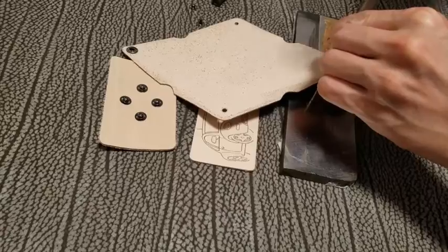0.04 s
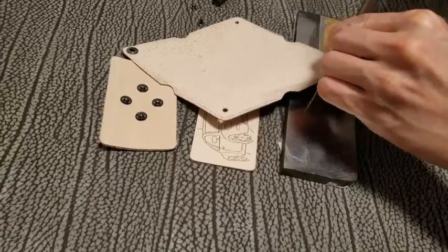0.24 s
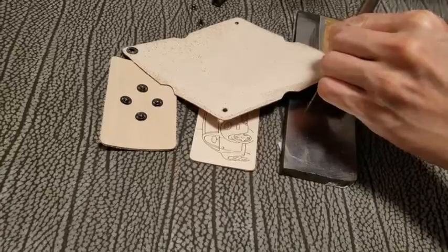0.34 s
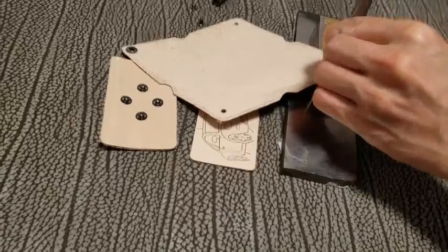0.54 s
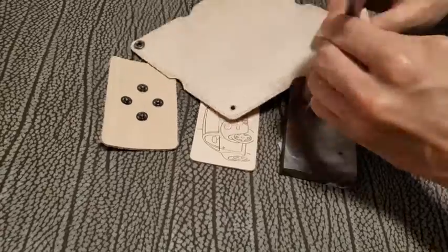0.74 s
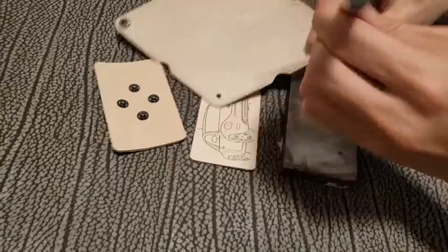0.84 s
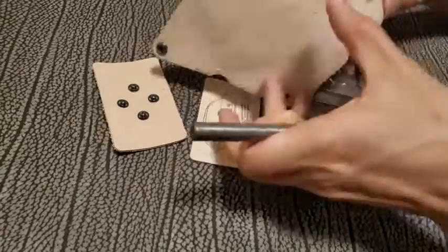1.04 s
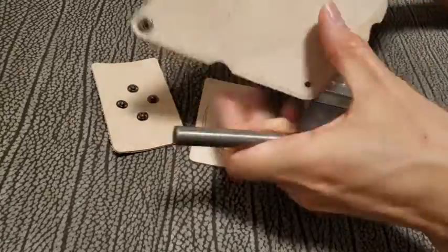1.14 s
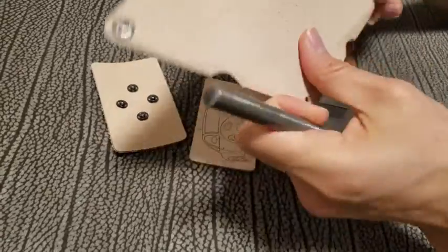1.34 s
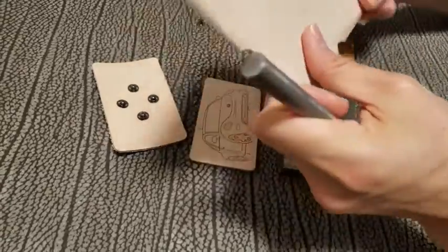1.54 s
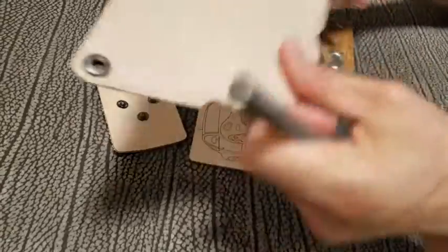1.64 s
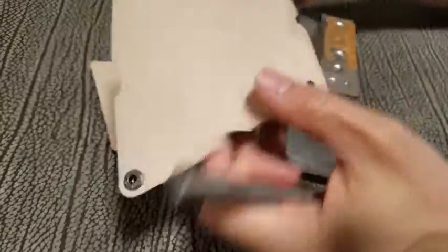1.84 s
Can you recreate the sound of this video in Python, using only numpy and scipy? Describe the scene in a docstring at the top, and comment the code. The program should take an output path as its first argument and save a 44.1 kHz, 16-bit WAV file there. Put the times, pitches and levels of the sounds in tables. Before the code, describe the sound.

A steel rod knocks sharply on a metal block on a table, then the block bumps and rattles with duller, woody thuds; faint ticks and leather rubs follow in a quiet room, close stereo microphone.

```python
"""A quiet room, a leather work table: a steel setting rod knocks on a steel block lying on the table top,
then the block is bumped and rattles there. Small ticks and rubs of tool and leather follow.
Knocks are dying sines for table and steel plus cracks and scatter of noise; ticks, rubs, room tone and
hum are shaped noise. The two microphone channels differ by small lags and partly independent noise.
The recorder ducks after loud knocks, then recovers."""
import sys
import numpy as np
from scipy import signal
from scipy.fft import rfft, irfft
from scipy.io import wavfile
from scipy.ndimage import uniform_filter1d, minimum_filter1d

SR = 44100
rng = np.random.default_rng(int(sys.argv[2]) if len(sys.argv) > 2 else 0)


def materialize(psi):
    """Save the field psi as 16-bit PCM at rate SR to the path in sys.argv[1].

    A 1-D psi becomes a single channel; in a 2-D psi each row is a channel.
    """
    bounded = np.clip(np.atleast_2d(psi).T, -1, 1)
    quanta = np.round(bounded * 32767).astype(np.int16)
    wavfile.write(sys.argv[1], SR, quanta)


N = 83790  # samples

# All levels are ahead of the recorder's gain control.
# Room tone spectrum: f/Hz, relative level/dB per Hz
AIR_SPECTRUM = [(12, -18), (22, -6), (40, -19.5), (130, -21.5), (200, -12.5), (400, -7), (700, -7.5),
                (1300, -8.5), (2100, -15.5), (4000, -20), (7500, -27), (8500, -22), (16200, -27.5)]
# Left-right likeness of the room tone: f/Hz, likeness [0 to 1]
AIR_LIKENESS = [(60, 0.89), (180, 0), (550, 0.32), (1650, 0.38), (4970, 0.015), (15000, 0.0)]
AIR_RMS_DB, AIR_PATCH_DB = -62.5, 1.0  # overall level; rms depth of the drifting patches

# Faint wavering tones in the room: f/Hz, rms level/dB
HUM_TONES = [(21, -76.5), (242, -84.5), (368, -80.5), (575, -81)]
HUM_WIDTH_HZ, HUM_LIKENESS = 7.3, 0.27  # full width at half amplitude; left-right likeness

# Ticks and rubs of tool and leather: start t/s, rms level at the peak/dB, rise t/s, t60/s, centre f/Hz,
# width at half amplitude f/Hz, broad treble re resonance level/dB, left minus right level/dB
TICKS_AND_RUBS = [(.854, -42, 0.0016, 0.026, 973, 200.3, -17, -9),
                  (0.8583, -41, 0.00033, 0.054, 1610, 960, 0, -1.5),
                  (0.8535, -46, 0.0021, 0.062, 3200, 250, -15.5, 14.5),
                  (0.967, -63, 0.0019, 0.054, 4510, 1517, 20, 2),
                  (1.0356, -52, 0.0015, 0.018, 1740, 2500, -32, -5),
                  (1.071, -66, 0.0087, 0.058, 3330, 800, -10, 0),
                  (1.107, -57, 0.0068, 0.095, 2970, 550, -11, -2),
                  (1.228, -56, 0.00039, .015, 2520, 2000, -9.5, -1),
                  (1.234, -55.5, 0.00073, .01, 3420, 2920, -5.5, -10),
                  (1.2511, -51, .0005, 0.012, 2970, 3560, -5.5, -5),
                  (1.268, -58.5, .003, 0.042, 2330, 400, -6, 0),
                  (1.686, -64, 0.0096, 0.11, 8730, 500, 0, 13.5),
                  (1.69, -59.5, 0.0056, 0.045, 2240, 300, -23, 2),
                  (1.717, -66.5, 0.0064, 0.36, 10000, 4000, 9, -2),
                  (1.817, -51, 0.0042, 0.018, 9200, 3000, -9, 12),
                  (1.8214, -44.5, 0.00092, 0.024, 2180, 250, -3, 1.5),
                  (1.822, -57.5, .001, 0.018, 4700, 300, -16.5, -6),
                  (1.862, -59, 0.0021, 0.024, 4040, 2500, -0.5, -10)]
TICK_LIKENESS = 0.52

# Spots struck: these choose a level column in TABLE_MODES
ROD, DROP, BOUNCE = range(3)
# Contacts of rod, block and table: start t/s (negative: only the tail is heard), spot struck,
# table ring level/dB, steel ring level/dB, scatter level/dB, crack level/dB,
# bass edge f/Hz, treble edge f/Hz, right channel lag t/ms
CONTACTS = [(-.06, BOUNCE, -9.5, -80, -16.5, -60, 200, 1480, 0.089),
            (0.2206, ROD, -23.5, -37, -20.5, -18, 108, 16000, 0.22),
            (.2223, ROD, 4, -15, -15, -14, 100, 16000, .2),
            (.230, DROP, -14.5, -31.5, -17, -15, 150.1, 9100, 0.13),
            (0.5378, BOUNCE, -2, -76, -32, -24, 297, 1560, 0.05),
            (.5481, DROP, 4.5, -56, -17, -8.5, 346.2, 4000, 0.05),
            (.575, DROP, -13.5, -78, -29.5, -33, 360, 2476, 0.17),
            (.6200, BOUNCE, 4.5, -42, -26.5, -49, 280, 4240, 0.13)]
# Table top modes, the last row a short thump of the rod: f/Hz, t60/s, polarity [+1 swings negative first, -1
# positive], # then relative level/dB when struck by the rod, at the drop and at the bounce
TABLE_MODES = [(114, .19, 1, -41, -50, -55), (194, .7, 1, -45, -62, -60), (236, .12, -1, -24, -48, -45),
               (303, .14, 1, -33, -40, -46), (372, .11, 1, -30, -25, -42), (408, .11, 1, -22, -28, -33),
               (474, .11, 1, -22, -38, -36), (576, .7, 1, -58, -62, -62), (540, .06, -1, -20, -34, -36),
               (620, .08, 1, -22, -23, -31), (667, .11, 1, -16, -21, -29), (704, .09, 1, -50, -50, -25),
               (712, .075, -1, -22, -21, -45), (758, .08, 1, -7, -7, -25), (791, .18, -1, -25, -23, -26),
               (801, .16, 1, -40, -40, -29), (822, .085, -1, -23, -23, -40),
               (1594, .085, -1, -32, -16, -36), (995, .07, 1, -29, -25, -33),
               (1343, .045, 1, -26, -27, -33), (1435, .05, -1, -28, -22, -39),
               (2290, .04, 1, -30, -36, -36), (640, .014, 1, -4, -16, -24)]
# Steel rod and block modes: f/Hz, relative level/dB, t60/s
STEEL_MODES = [(3165, -27, .34), (3257, -28, .36), (3350, 10, .012), (3525, -14, .07), (8520, -6, .04),
               (8678, -8, .05), (10180, -10, .05), (10270, -6, .06), (12760, -12, .05)]
# Rattle and nearby reflections, spectrum: f/Hz, relative level/dB per Hz
SCATTER_SPECTRUM = [(30, -10), (60, -17), (200, -15.5), (700, -7.5), (1500, -9.5), (3300, -9),
                    (6000, -17.5), (8500, -16.5), (12000, -12.5), (16000, -18.5)]
# Rattle and nearby reflections, decay: f/Hz, t60/s
SCATTER_DECAY = [(100, .15), (400, .12), (1500, .09), (4000, .08), (9000, .085), (16000, .08)]
SCATTER_LIKENESS, SCATTER_RISE_S = 0.5, 0.00033
CRACK_T60_S = 0.022

# Recorder: gain control, clipping level [full scale = 1] and upper band limit
DUCK_FROM_DB, DUCK_SHARE = -38.5, 0.15  # threshold; dB of ducking for each dB above it
HOLD_S, RECOVER_DB_PER_S = 0.21, 144.5  # recovery is the fall of the sensed level
EARLIER_DB = -30  # sensed level at the start: still recovering from an earlier knock
CEILING, EDGE_HZ = 0.88, 16400


def amp(db):
    """Amplitude ratio of a level in dB."""
    return 10 ** (np.asarray(db) / 20)


def evened(x):
    """Scale to an rms of one over all channels."""
    return x / np.sqrt(np.mean(x ** 2) + 1e-20)


def read(points, hz):
    """Read a curve of (f, value) points along a logarithmic frequency axis."""
    f, value = np.transpose(points)
    return np.interp(np.log(hz + 1), np.log(f + 1), value)


def add(mix, start_s, sound):
    """Lay a sound into the mix, cutting whatever falls outside it."""
    at = round(start_s * SR)
    sound = sound[..., max(-at, 0):]
    part = mix[:, max(at, 0):][:, :sound.shape[-1]]
    part += sound[..., :part.shape[1]]


def alike(a, b, likeness):
    """Two channels from independent noises a and b, correlated by the likeness."""
    return np.array([a, likeness * a + np.sqrt(1 - likeness ** 2) * b])


def noise_pair(likeness, size):
    """White noise in two channels of the given likeness."""
    a, b = rng.standard_normal((size, 2)).T
    return alike(a, b, likeness)


def resonance(hz, centre_hz, width_hz):
    """Amplitude response of one resonance, half as high at the edges of its width."""
    return 1 / (1 + (2 * (hz - centre_hz) / width_hz) ** 2)


def air():
    """Steady room tone: coloured noise with faint patches drifting over time and frequency."""
    frames, hz = N // 256 + 5, np.fft.rfftfreq(1024, 1 / SR)
    a, b, c, d, patches = rng.standard_normal((frames, 513, 5)).T
    patches = uniform_filter1d(patches, 10, axis=0)
    patches = evened(uniform_filter1d(patches, 10, axis=1))
    likeness = np.clip(read(AIR_LIKENESS, hz), -1, 1)[:, None]
    spectrum = alike(a + 1j * b, c + 1j * d, likeness)
    spectrum *= amp(read(AIR_SPECTRUM, hz)[:, None] + AIR_PATCH_DB * patches)
    tone = signal.istft(spectrum, nperseg=1024, noverlap=768)[1][:, :N]
    return amp(AIR_RMS_DB) * evened(tone)


def hum():
    """Narrow bands of noise, heard as tones that waver in level."""
    hz = np.fft.rfftfreq(N, 1 / SR)
    spectrum = rfft(noise_pair(HUM_LIKENESS, N))
    total = 0
    for tone_hz, db in HUM_TONES:
        band = irfft(spectrum * resonance(hz, tone_hz, HUM_WIDTH_HZ), N)
        total = total + amp(db) * evened(band)
    return total


def tick(db, rise_s, t60, centre_hz, width_hz, treble_db, pan_db):
    """A puff of friction noise around one resonance, with some broad treble."""
    t = np.arange(SR // 5) / SR
    hz = np.fft.rfftfreq(len(t), 1 / SR)
    peak = resonance(hz, centre_hz, width_hz)
    broad = hz / (hz + 2500) / (1 + (hz / 14000) ** 2)
    colour = evened(peak) + amp(treble_db) * evened(broad)
    noise = evened(irfft(rfft(noise_pair(TICK_LIKENESS, len(t))) * colour, len(t)))
    rise = np.minimum(t / rise_s, 1)
    decay = amp(db - 60 * np.maximum(t - rise_s, 0) / t60)
    return noise * rise * decay * amp([[pan_db / 2], [-pan_db / 2]])


def ring(modes, t):
    """Free vibration: a dying sine for each mode (f/Hz, level/dB, t60/s)."""
    return sum(amp(db - 60 * t / t60) * np.sin(2 * np.pi * hz * t) for hz, db, t60 in modes)


def table_ring(spot, t):
    """The spot struck sets how strongly each mode of the table top, and the rod's short thump, is excited."""
    return sum(-mode[2] * ring([(mode[0], mode[3 + spot], mode[1])], t) for mode in TABLE_MODES)


def scatter_noise(t):
    """Rattle and nearby reflections: noise whose decay time depends on frequency."""
    hz, frames, z = signal.stft(noise_pair(SCATTER_LIKENESS, len(t)), SR, nperseg=128)
    decay_db = -60 * frames / read(SCATTER_DECAY, hz)[:, None]
    z = z * amp(read(SCATTER_SPECTRUM, hz)[:, None] + decay_db)
    scatter = signal.istft(z, SR, nperseg=128)[1][:, :len(t)]
    scatter = scatter / np.sqrt(np.mean(scatter[:, :SR // 50] ** 2))  # rms of the first 20 ms
    return scatter * np.minimum(t / SCATTER_RISE_S, 1)


def knock(spot, table_db, steel_db, scatter_db, crack_db, bass_hz, treble_hz, lag_ms):
    """A contact cracks, rings table and steel and sets off a short scatter; low treble edges sound dull."""
    t = np.arange(SR // 2) / SR
    heard = np.maximum([t, t - lag_ms / 1000], 0)  # time since arrival, left and right
    table = amp(table_db) * table_ring(spot, heard)
    scatter = amp(scatter_db) * scatter_noise(t)
    crack = noise_pair(SCATTER_LIKENESS, len(t)) * amp(crack_db - 60 * t / CRACK_T60_S)
    noise = scatter + crack
    noise[1] = np.roll(noise[1], round(lag_ms * SR / 1000))
    contact = signal.butter(2, [bass_hz, treble_hz], "bandpass", fs=SR, output="sos")
    body = signal.sosfilt(contact, noise + table)
    return body + amp(steel_db) * ring(STEEL_MODES, heard)  # the steel bypasses the contact filter


def scene():
    """The room first, then the knocks, ticks and rubs at their times."""
    mix = air() + hum()
    for start_s, *contact in CONTACTS:
        add(mix, start_s, knock(*contact))
    for start_s, *rub in TICKS_AND_RUBS:
        add(mix, start_s, tick(*rub))
    return mix


def record(dry):
    """Gain control ducks after loud knocks, holds, then recovers; then clipping and the band limit."""
    power = uniform_filter1d((dry ** 2).mean(0), 400)  # both channels, averaged over 9 ms
    power_db = 10 * np.log10(abs(power) + 1e-12)
    hold = int(HOLD_S * SR) // 2
    held_db = -minimum_filter1d(-power_db, 2 * hold + 1, origin=hold)  # highest level in the past hold
    fall = np.arange(N) * RECOVER_DB_PER_S / SR
    # adding the fall before the running maximum makes the sensed level drop steadily after each peak
    sensed_db = np.maximum(np.maximum.accumulate(held_db + fall), EARLIER_DB) - fall
    over_db = np.maximum(sensed_db - DUCK_FROM_DB, 0)
    ducked = dry * amp(-DUCK_SHARE * uniform_filter1d(over_db, 200))
    clipped = np.clip(ducked, -CEILING, CEILING)
    lowpass = signal.firwin(511, EDGE_HZ, window=("kaiser", 9), fs=SR)
    return signal.oaconvolve(clipped, lowpass[None], "same")


dry = scene()
out = record(dry)
materialize(out)
```